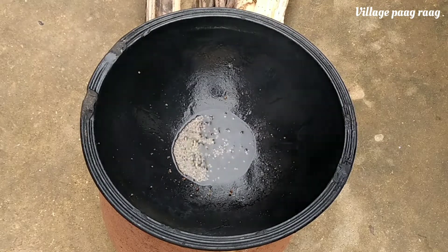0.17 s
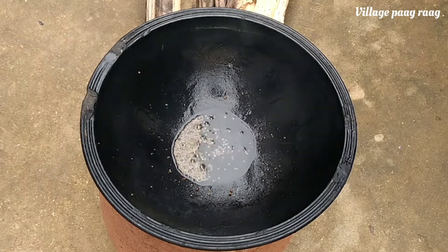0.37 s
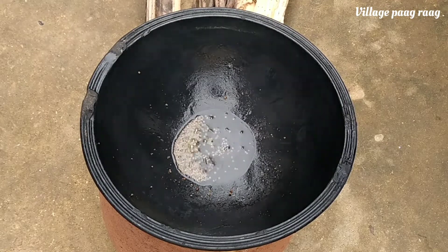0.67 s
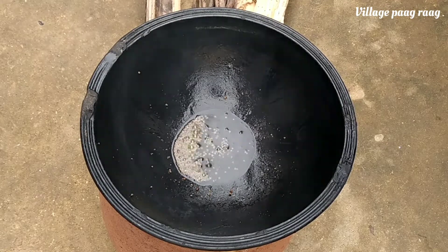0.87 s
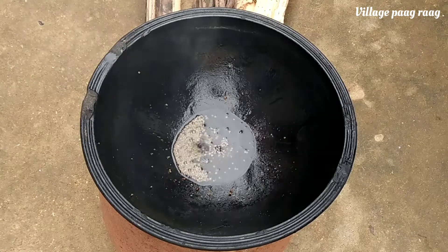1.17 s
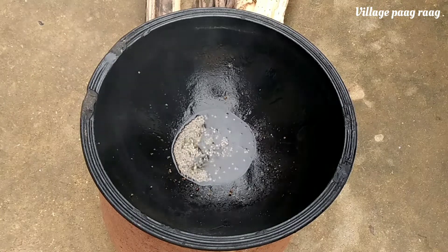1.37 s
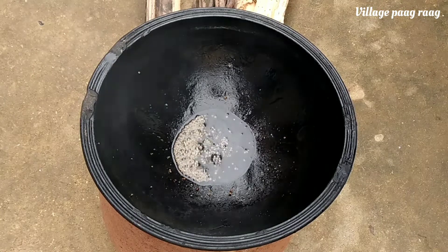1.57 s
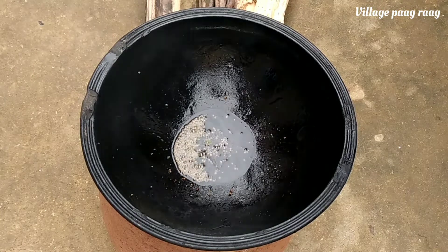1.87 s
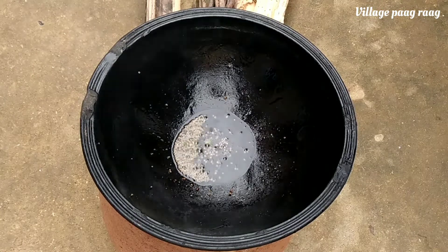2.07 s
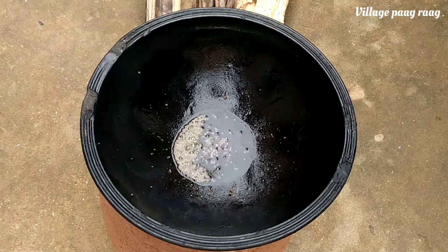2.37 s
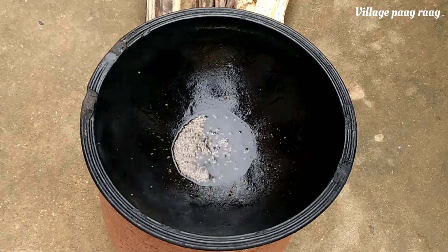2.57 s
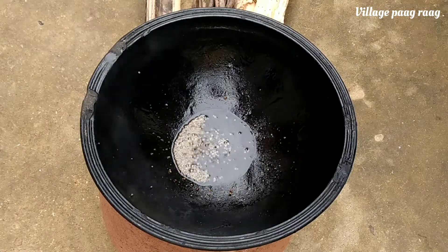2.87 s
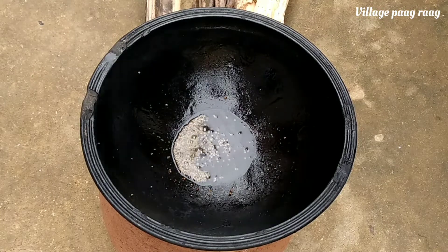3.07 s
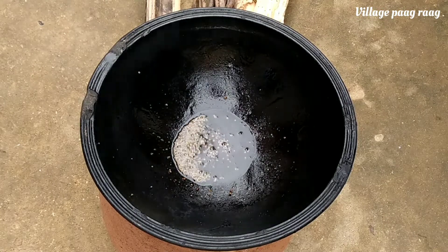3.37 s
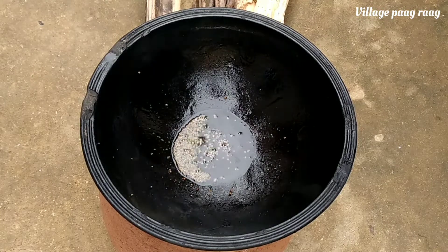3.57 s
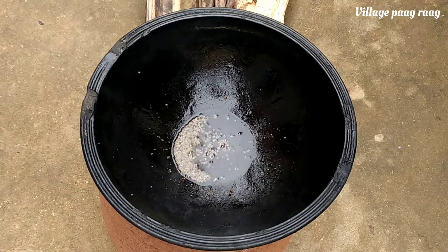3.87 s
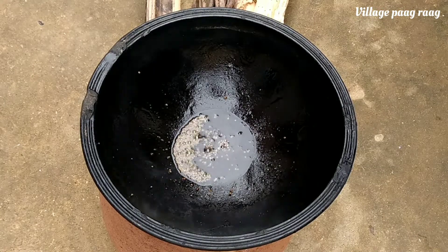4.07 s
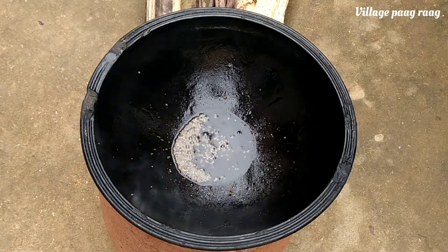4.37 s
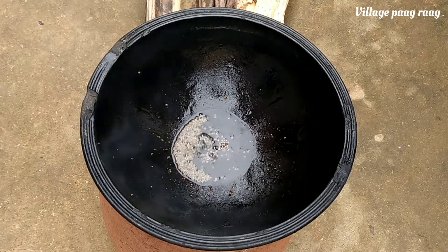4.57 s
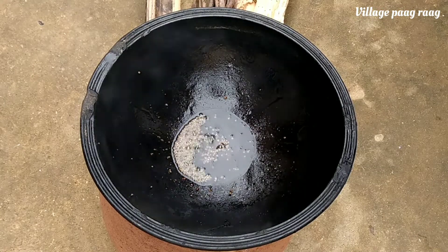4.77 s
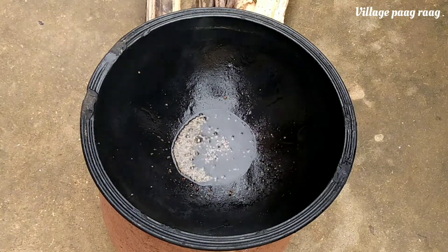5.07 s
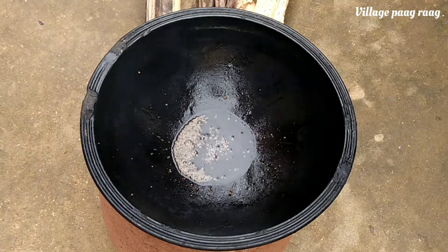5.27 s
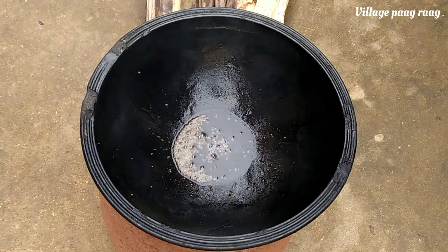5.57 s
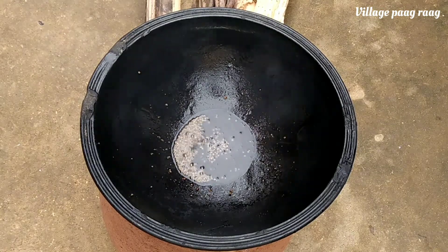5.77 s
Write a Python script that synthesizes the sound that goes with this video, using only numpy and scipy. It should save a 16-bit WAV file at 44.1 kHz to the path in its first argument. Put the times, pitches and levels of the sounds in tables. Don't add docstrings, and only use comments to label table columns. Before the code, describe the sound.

Irregular bright snaps of bursting seeds ring briefly off an iron pan outdoors, with tiny oil spits, soft sizzling and faint far rumble.

```python
import sys
import numpy as np
from scipy import signal
from scipy.fft import rfft, irfft
from scipy.io import wavfile
from scipy.ndimage import uniform_filter1d

SR = 44100
rng = np.random.default_rng(int(sys.argv[2]) if len(sys.argv) > 2 else 0)


def wav_record(signal):
    frames = np.transpose(np.atleast_2d(signal))
    bounded = np.clip(frames, -1, 1)
    quanta = np.round(bounded * 32767).astype(np.int16)
    wavfile.write(sys.argv[1], SR, quanta)


def level_to_linear(level):
    exponent = np.asarray(level, float) / 20
    return 10 ** exponent


N = 261513

# start_s, sizzle_db
HEAT = [(0, -64), (.26, -62.5), (.46, -67), (.91, -66), (1.22, -62.5), (1.42, -65), (1.58, -61),
        (1.78, -63.5), (2.15, -64), (2.38, -62.5), (2.77, -66), (3.07, -60.5), (3.43, -63.5), (3.91, -66.5),
        (4.36, -63.5), (4.96, -66), (5.93, -64.5)]
# freq_hz, density_db_per_hz
SIZZLE_SPECTRUM = [(2650, -37.5), (4500, -18), (5050, -14), (6910, -9.5), (7990, -2), (9530, 0.5),
                   (11200, -6), (13800, -8.5), (14600, -17.5), (15000, -31)]
# freq_hz, density_db_per_hz
OUTDOOR_SPECTRUM = [(12, -39.5), (20, 1), (65, -0.5), (109, -8.5), (151, -6), (204, -14), (325, -14.5),
                    (382, -10), (620, -20.5), (1210, -28), (2500, -30), (3250, -52.5), (5500, -120)]
# start_s, level_db, reflected_path_extra_m
ENGINE_PATH = [(0, -58.5, .1), (.31, -59.5, .15), (.79, -56, 0.19), (1.04, -60, 0.46), (1.25, -51.5, 0.51),
               (1.55, -64, 0.27), (1.72, -53.5, 0.59), (2.0, -61.5, 0.3), (2.1, -55, 1.17),
               (2.26, -59, 0.96), (2.71, -52.5, 1), (2.92, -62, 1.05), (3.25, -59, 0.91), (3.8, -59, 1.16),
               (4.24, -62, 1.25), (4.43, -59.5, 1.3), (4.75, -56.5, 1.74), (5.93, -58.5, 2.32)]
ENGINE_MAIN_LINES = list(enumerate((0, -7, -15), start=1))
# multiple, level_db
ENGINE_WEAK_LINES = [(.5, -78), (1.5, -83), (2.5, -81), (3.75, -83), (4.5, -84), (5, -78), (6, -85),
                     (7.5, -89)]
# start_s, level_db, left_lean_db, brightness_db
CRACKS = [(0.0678, -20, 7.5, -11), (0.1589, -19, 0, 10), (0.4959, -25, 2, -11.5), (0.5089, -51, 7.5, -12),
          (0.5179, -31, 0.5, 3), (0.7976, -33, 5, -11), (1.0006, -50, -8, -4), (1.1993, -9.5, 12.5, 0.5),
          (1.3389, -25.5, 4.5, -3.5), (1.4033, -12.5, -2.5, -15), (1.4164, -24, 13.5, -26.5),
          (1.4221, -35.5, 7, -24.5), (1.568, -24, 1.1, -6), (1.6493, -11, 4.5, -25), (2.3238, -17, 4, -7.5),
          (2.3951, -18, 6, -20.5), (2.4154, -29.5, 2.1, -10), (2.8915, -20, 2, -17), (2.9038, -20.5, 1, -8),
          (3.1001, -17, 8.5, -9.5), (3.2184, -41, -3, -22), (3.6107, -29.5, -6.5, -14),
          (3.783, -18.5, 3, -15), (3.8893, -20, 0, -5), (4.1504, -34, -7, -4.5), (4.3982, -27, 2.5, -0.5),
          (4.4673, -34.5, 7, 0), (4.6123, -28.5, -11.5, -17), (5.0496, -20.5, 1, 18),
          (5.8309, -29, 9, -12.5)]
# start_s, level_db, left_lean_db
SPITS = [(0.2393, -43, -4), (1.0213, -48, 4), (1.3801, -44, 15), (1.4485, -56, -3), (1.4827, -42, 10),
         (1.497, -38, 3), (1.5191, -38.5, 17), (1.6683, -47.5, 17), (2.459, -42.5, 4), (2.8703, -33, 1),
         (2.9985, -50, 12), (3.255, -47, -12), (4.0697, -45.5, -12), (4.4595, -45, -4), (4.513, -46, -8.5),
         (5.811, -39.5, 0.5), (5.82, -50, -8)]
# freq_hz, width_hz, level_db
LEFT_PORT = [(7200, 1100, -9), (9300, 1500, 0), (11500, 2000, 0), (13700, 1500, -4)]
# freq_hz, width_hz, level_db
RIGHT_PORT = [(6400, 1200, -8), (7950, 1200, 0), (10800, 2200, -3), (13500, 2000, -5)]
# start_s, low_air_db, high_air_db, knock_db, thump_db
POPS = [(0.0678, -37, -24.5, -28, -40.5), (0.4963, -48, -26, -31, -64), (1.1991, -30, -23, -23.5, -42.5),
        (1.4031, -28, -25, -28, -43.5), (1.5679, -37.5, -31, -27.5, -54),
        (1.6493, -25, -22.5, -26.5, -34.5), (2.3239, -27, -20.5, -26.5, -43),
        (2.3959, -24, -25, -23.5, -48), (2.4159, -33.5, -26.5, -26, -57),
        (2.8916, -23, -25.5, -29.5, -38.5), (2.904, -36, -21.5, -25.5, -47.5),
        (3.1002, -22, -19, -24.5, -35), (3.7827, -61, -41, -33.5, -49.5), (3.8897, -32, -20, -26.5, -54.5),
        (5.831, -44, -48, -29.5, -67.5)]
# start_s, low_air_db, high_air_db, knock_db, knock_brightness_db
SMALL_POPS = [(0.1587, -56, -39, -30, 5.5), (0.5095, -38.5, -28, -33, -1), (0.519, -71, -29, -32, 4.5),
              (0.7978, -56, -28, -38.5, 3), (1.0011, -53, -44, -40.5, 0.5), (1.0228, -58, -49.5, -63, 4),
              (1.0763, -57, -43.5, -61, -6), (1.339, -55, -30, -33.5, -0.2), (1.4163, -59, -40, -45, -9),
              (1.4212, -40, -37, -31.5, -0.5), (3.2189, -38.5, -32.5, -39, -0.5),
              (3.6105, -71.5, -32.5, -40, 0.5), (4.1507, -46, -37, -34, -0.5),
              (4.1683, -36.5, -52.5, -48, 6), (4.3985, -51.5, -55, -34.5, 3),
              (4.4674, -45.5, -30.5, -33.5, 0), (4.6121, -54, -51.5, -34, 4.5),
              (5.0496, -68.5, -65, -49.5, 15)]
# freq_hz, width_hz, level_db
KNOCK_MODES = [(3317, 303, 3), (4094, 477, 5), (4325, 810, 1.5), (5570, 1680, -5.5), (6170, 900, -7)]
# freq_hz, width_hz, level_db
BODY_MODES = [(573, 260, -15), (1524, 1370, -0.5)]
# freq_hz, left_lean_db
AIR_MODES = [(2200, 1.7), (2715, -0.5)]
# freq_hz, level_db, t60_s
IRON_MODES = [(2165, -21, .08), (2252, -15, .14), (2730, -27, .07), (3750, -22, .05)]
# start_s, freq_hz, level_db
THUDS = [
    (1.1992, 349, -36.5),
    (1.1994, 1188, -47),
    (2.2224, 800, -47.5),
    (2.2275, 1200, -39.5),
]
# freq_hz, gain_db
YARD_COLOUR = [(500, -21.5), (1700, -17.5), (2000, -1.5), (2250, -3.5), (2500, -9.5), (3400, -2.5),
               (4500, -1.5), (6000, -0.5), (9000, -3), (14000, -7)]
# freq_hz, density_db_per_hz
HISS_SPECTRUM = [(1200, -27.5), (2000, -10.5), (2700, 2), (3050, -1.5), (3500, 0.5), (5000, -3),
                 (6500, -4.5), (8000, -26.5)]
# freq_hz, dropped_time_percent
DROPOUTS = [(2100, 0), (2800, 8), (3050, 40), (3300, 14), (4400, 22), (4950, 40), (5400, 22), (6500, 12),
            (7200, 0), (14350, 0), (14500, 100)]


def level(x, db):
    return x * level_to_linear(db) / np.sqrt(np.mean(x ** 2))


def peak(x, db):
    return x * level_to_linear(db) / np.abs(x).max()


def lean(left_db):
    return level_to_linear(np.array([[left_db], [-left_db]]))


def shape(x, gain_at):
    size = x.shape[-1]
    return irfft(rfft(x) * gain_at(np.arange(size // 2 + 1) * SR / size + 1), size)


def slope(points):
    hz, db = np.transpose(points)
    return lambda f: level_to_linear(np.interp(np.log(f), np.log(hz), db))


def resonances(modes, lifts_db):
    def gain_at(f):
        total = 0
        for k, (hz, width_hz, db) in enumerate(modes):
            detune = (f / hz - hz / f) * hz / width_hz
            total = total + (-1) ** k * level_to_linear(db + lifts_db[k]) / (1 + 1j * detune)
        return total
    return gain_at


def walk(rate_hz):
    k = int(SR / rate_hz)
    steps = np.repeat(rng.standard_normal(N // k + 1), k)
    return 1.5 * uniform_filter1d(uniform_filter1d(steps, k), k)[:N]


def faded(x):
    return x * np.minimum(4 * np.linspace(1, 0, x.shape[1]), 1) ** 2


def oil(sizzle_db):
    struck = rng.random((2, N)) < .02
    ticks = rng.standard_normal((2, N)) * struck * level_to_linear(2.5 * rng.exponential(size=(2, N)))
    flicker = level_to_linear(0.87 * walk(25))
    fizz = level(ticks, -10.0) + flicker * rng.standard_normal((2, N))
    return level(shape(fizz, slope(SIZZLE_SPECTRUM)), 0) * level_to_linear(sizzle_db + np.array([[4.5], [1.5]]))


def outdoor_air():
    air_db = -0.432 * np.arange(N) / SR + 0.2475 * walk(4.5)
    mid, side = shape(rng.standard_normal((2, N)), slope(OUTDOOR_SPECTRUM))
    side = shape(side, lambda f: np.minimum((f / 1200) ** 0.55, 1))
    air = level(mid + side * np.array([[1], [-1]]), -65)
    return air * level_to_linear(air_db - air_db.mean()) * lean(.7)


def rumble():
    rumble_db = -70 - 0.8 * np.arange(N) / SR + 2 * walk(3.8)
    spectrum = slope([(12, -12.5), (22, 1.5), (45, -2.5), (70, -13), (120, -64.0)])
    mid = shape(rng.standard_normal(N), spectrum)
    both = mid + 0.22 * np.roll(mid, N // 3) * np.array([[1], [-1]])
    return level(both, 0) * level_to_linear(rumble_db)


def engine(level_db, extra_m):
    firing_hz, mirror_db, sound_m_s = 75.35, -2.5, 343
    turn = 2 * np.pi * np.cumsum(firing_hz * (1 + 0.00301 * walk(1.9))) / SR
    lines = []
    for k, db in ENGINE_MAIN_LINES:
        mirror = level_to_linear(mirror_db) * np.exp(2j * np.pi * k * firing_hz * extra_m / sound_m_s)
        lines.append((k, level_to_linear(level_db + db) * np.abs(1 + mirror) / 2))
    for k, db in ENGINE_WEAK_LINES:
        lines.append((k, level_to_linear(db + 2.8 * walk(2.7))))
    out = np.zeros(N)
    for k, gain in lines:
        phase = 2 * np.pi * rng.random() + 0.23 * walk(5.5)
        out += np.sqrt(2) * gain * np.sin(k * turn + phase)
    return out


def burst_noise(length_ms, ms, apart=1.0, spatter=0.15, spatter_ms=3.5):
    front = 1.5 * np.exp(-ms / 0.0405) + np.exp(-ms / length_ms)
    bounce = .45 * np.exp(-np.abs(ms - 1.1) / .08)
    burst = front + bounce + spatter * np.exp(-ms / spatter_ms)
    return burst * (rng.standard_normal(len(ms)) + apart * rng.standard_normal((2, len(ms))))


def husk(db, left_lean_db, bright_db=-9.5):
    length_ms = np.clip(.9 + .6 * (db + 10), .1, 2)
    bursts = burst_noise(length_ms, np.arange(2048) / SR * 1000)
    lifts_db = (bright_db - 4.5) * np.array([0, 0, 1, 1]) + 3.4 * rng.standard_normal((2, 4))
    left = shape(bursts[0], resonances(LEFT_PORT, lifts_db[0]))
    right = shape(bursts[1], resonances(RIGHT_PORT, lifts_db[1]))
    left = peak(left, db + left_lean_db / 2 - .8)
    right = peak(right, db - left_lean_db / 2 - .8)
    return faded(np.array([left, right]))


def knock(db, bright_db, ms):
    lifts_db = 1.92 * rng.standard_normal(len(KNOCK_MODES)) + bright_db * np.arange(-1, 4) / 2
    strike = burst_noise(0.37, ms, apart=1.3, spatter=0.5, spatter_ms=5.8)
    return peak(shape(strike, resonances(KNOCK_MODES, lifts_db)), db + 2.0) * lean(-2.5)


def thump(db, ms):
    return peak(shape(np.exp(-ms / 0.091), resonances(BODY_MODES, (0, 0))), db)


def bowl_air(low_db, high_db, ms):
    hold, rise = np.exp(.15 * rng.standard_normal(2))
    hold_ms, rise_ms = 3.05 * hold, 0.47 * rise
    swell = (1 - np.exp(-ms / rise_ms)) * np.exp(-(ms / hold_ms) ** 2)
    out = 0
    for (hz, left_db), db in zip(AIR_MODES, (low_db, high_db)):
        hz = hz * (1 + 0.0025 * rng.standard_normal())
        tone = np.sin(2 * np.pi * (hz * ms / 1000 + rng.random()))
        out = out + level_to_linear(db + 3.0) * swell * tone * lean(left_db)
    return out


def iron_ring(low_db, high_db, knock_db, ms):
    span = int(3.5 * SR / 1000)
    out = 0
    for (hz, db, t60_s), drive_db in zip(IRON_MODES, (low_db, low_db, high_db, knock_db)):
        hz = hz * (1 + 0.0032 * rng.standard_normal())
        tone = np.sin(2 * np.pi * (hz * ms / 1000 + rng.random((2, 1)) / 3))
        ring = (1 - np.exp(-ms / 1.7)) * level_to_linear(-60 * ms / 1000 / t60_s) * tone
        flutter = np.sqrt(span) * uniform_filter1d(rng.standard_normal((2, len(ms))), span)
        ring_db = drive_db + db - 1.5 + 2.1 * rng.standard_normal()
        out = out + level_to_linear(ring_db) * ring * (1 + .8 * flutter)
    return out


def pop(low_db, high_db, knock_db, thump_db, bright_db=0.5):
    ms = np.arange(6144) / SR * 1000
    out = knock(knock_db, bright_db, ms) + thump(thump_db, ms)
    out = out + bowl_air(low_db, high_db, ms) + iron_ring(low_db, high_db, knock_db, ms)
    return faded(out)


def small_pop(low_db, high_db, knock_db, bright_db):
    strongest_db = max(low_db, high_db - 12.5, knock_db - 3.5)
    return pop(low_db, high_db, knock_db, strongest_db - 20.5, bright_db)


def thud(hz, db):
    turn = 2 * np.pi * hz * np.arange(1024) / SR
    return level_to_linear(db) * np.sin(turn) * np.exp(-turn / 1.6) * np.ones((2, 1))


def seeds():
    lag = 4
    out = np.zeros((2, N + 9000))
    for table, voice in ((CRACKS + SPITS, husk), (POPS, pop), (SMALL_POPS, small_pop), (THUDS, thud)):
        for start_s, *row in table:
            one = voice(*row)
            i = int(start_s * SR) - 8
            out[0, i + lag:i + lag + one.shape[1]] += one[0]
            out[1, i:i + one.shape[1]] += one[1]
    return out[:, :N]


def yard(x):
    s = np.arange(SR) / SR
    tail = level_to_linear(-22 - 60 * s / 0.18) + level_to_linear(-34 - 60 * s / 0.85)
    rough = shape(rng.standard_normal((2, SR)), slope(YARD_COLOUR)) / 10
    echo = tail * (1 - np.exp(-s / 0.00054)) * rough
    return signal.fftconvolve(x * (1 + .35 * walk(1200)), echo, axes=1)[:, :N]


def along(table):
    start_s, *columns = np.array(table).T
    return [np.interp(np.arange(N) / SR, start_s, column) for column in columns]


def scene():
    bursts = seeds()
    surroundings = outdoor_air() + rumble() + engine(*along(ENGINE_PATH))
    return oil(*along(HEAT)) + surroundings + bursts + yard(bursts)


def capsule_hiss():
    hiss = shape(rng.standard_normal((2, N)), slope(HISS_SPECTRUM))
    return level(hiss, -75) * level_to_linear(0.46 * walk(5.4))


def input_offset():
    s = np.arange(N) / SR
    return np.array([[-.0105], [-.0062]]) * (np.exp(-s / .33) - .8 * np.exp(-s / .05))


def short_top(x, span=260):
    high = shape(x, lambda f: f > 14450)
    power = uniform_filter1d((high ** 2).sum(axis=0), span)
    gate = (power > 6 * np.median(power)) & (power > .1 * uniform_filter1d(power, 8 * span))
    gate &= power > .5 * np.roll(uniform_filter1d(power, 6 * span), 4 * span)
    return x - high * (1 - uniform_filter1d(1. * gate, span // 2))


def starve(x, size=2048, cell=6):
    hz, _, z = signal.stft(x, SR, nperseg=size)
    power = uniform_filter1d((np.abs(z) ** 2).sum(axis=0), cell, axis=0)
    power = uniform_filter1d(power, 4, axis=1)[::cell]
    around = uniform_filter1d(power, 15, axis=0)
    order = (power / around ** .8).argsort(axis=1).argsort(axis=1)
    rank_percent = 100 * order / power.shape[1]
    burst = around > 5 * np.median(around, axis=1, keepdims=True) + 1e-13
    dropped_percent = np.interp(hz[::cell], *np.transpose(DROPOUTS))[:, None]
    keep = burst | (rank_percent >= dropped_percent)
    keep = np.roll(np.repeat(keep, cell, axis=0), -(cell // 2), axis=0)[:len(hz)]
    return signal.istft(z * keep, SR, nperseg=size)[1][:, :N]


def band_limit(x):
    return signal.sosfilt(signal.butter(12, 15540, fs=SR, output="sos"), x)


def record(dry):
    top_steps = slope([(13000, -1.0), (14300, -2.0), (14500, -11), (16400, -30.5), (16800, -60)])
    heard = shape(dry + capsule_hiss(), top_steps)
    mix = starve(short_top(heard)) + input_offset()
    return band_limit(mix)


dry = scene()
out = record(dry)
wav_record(out)
```